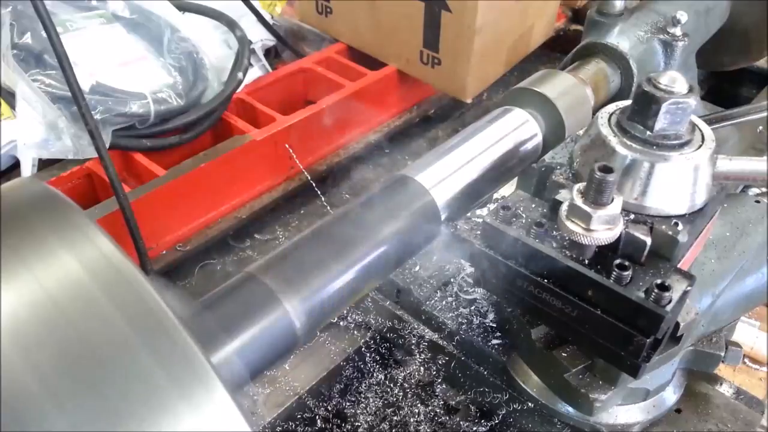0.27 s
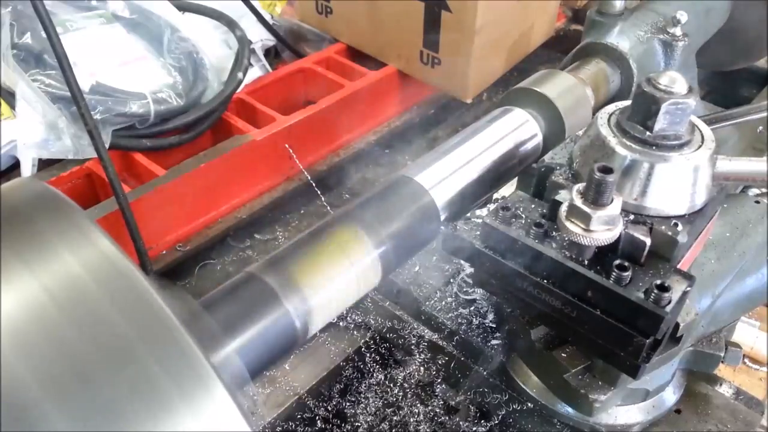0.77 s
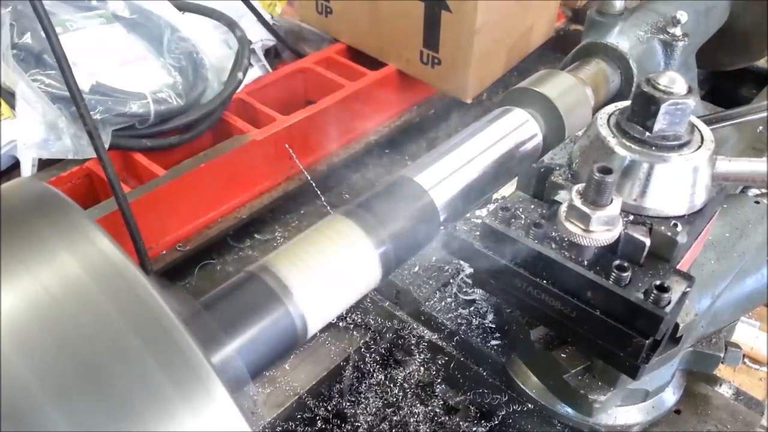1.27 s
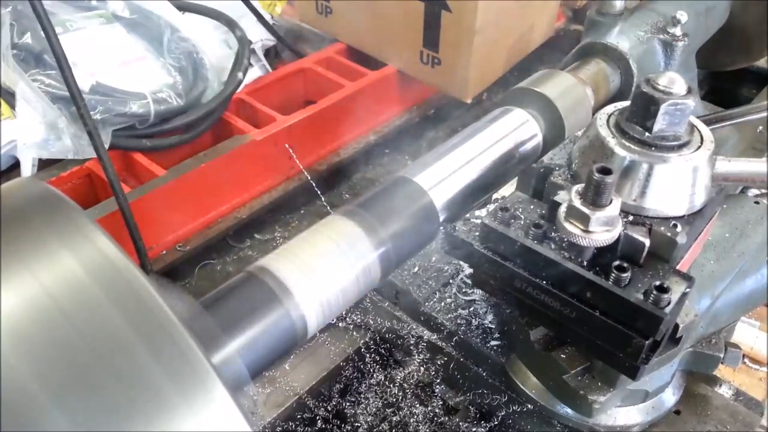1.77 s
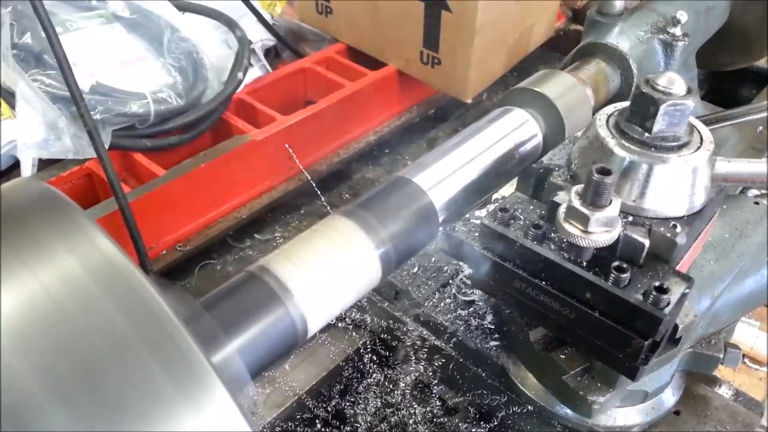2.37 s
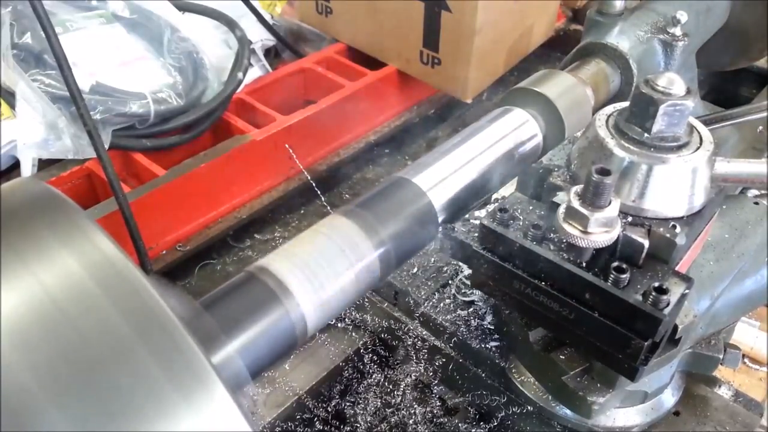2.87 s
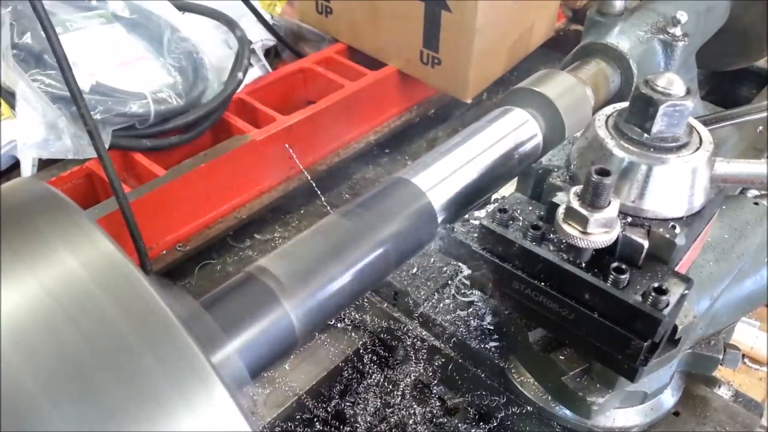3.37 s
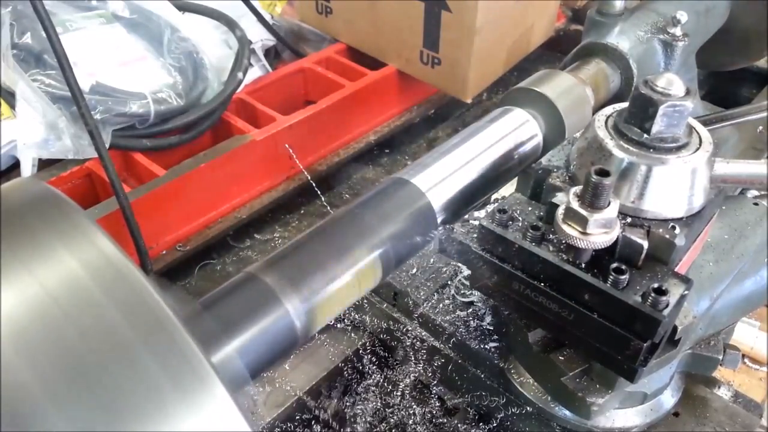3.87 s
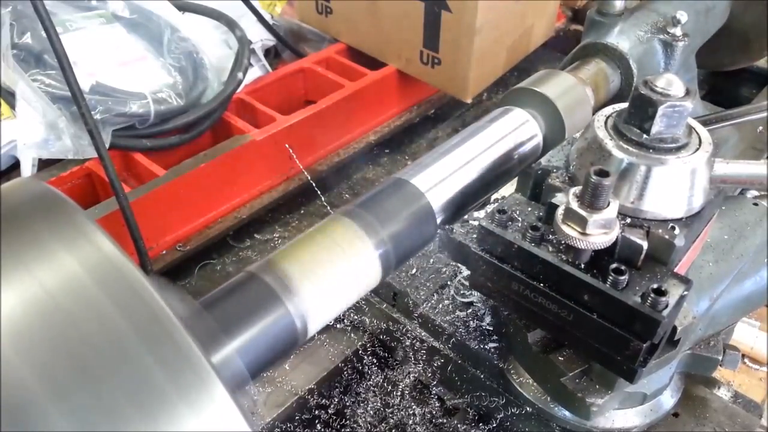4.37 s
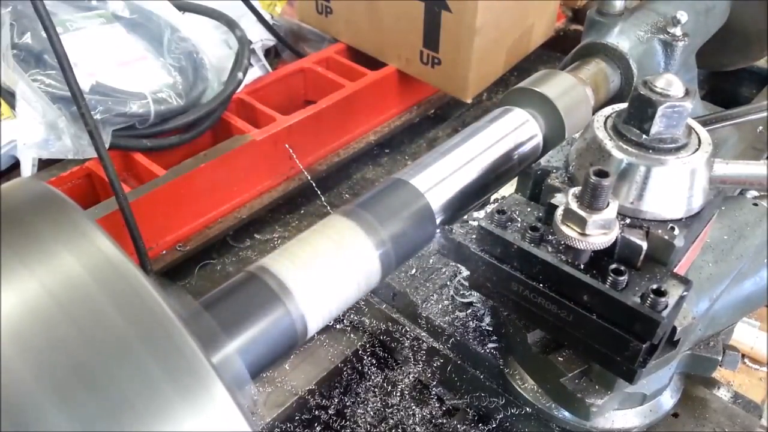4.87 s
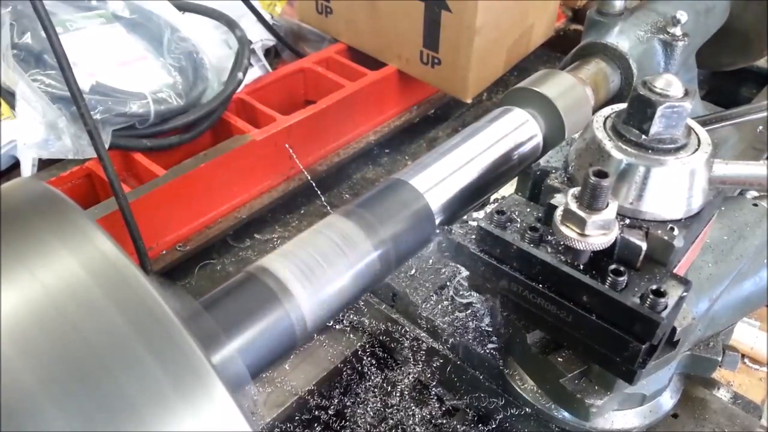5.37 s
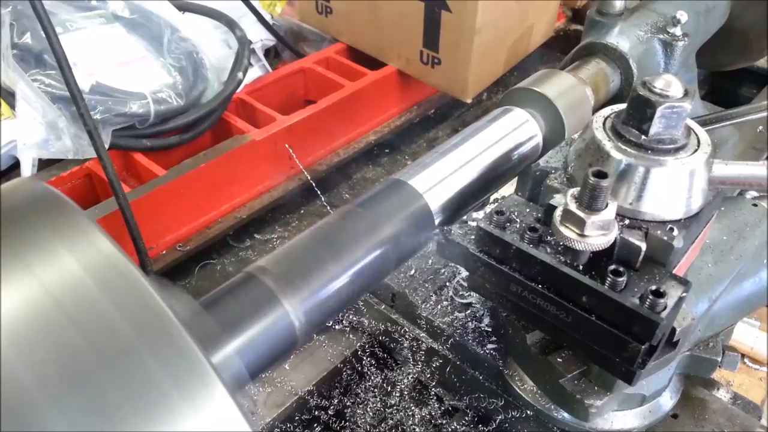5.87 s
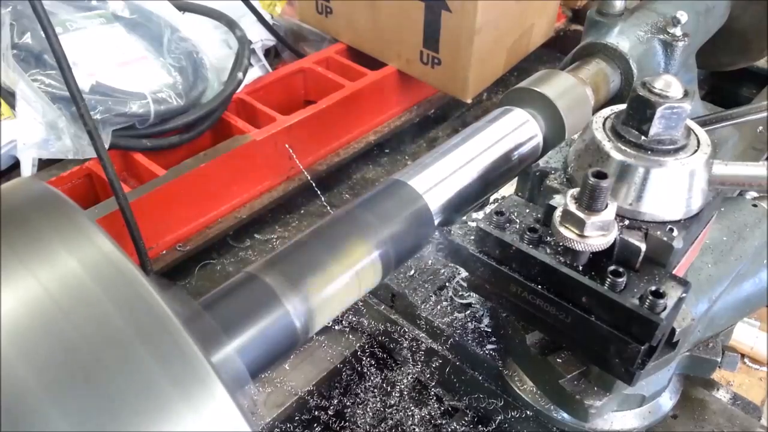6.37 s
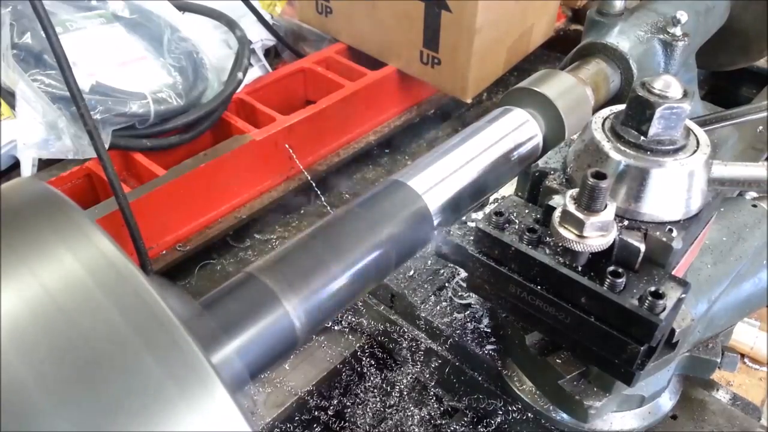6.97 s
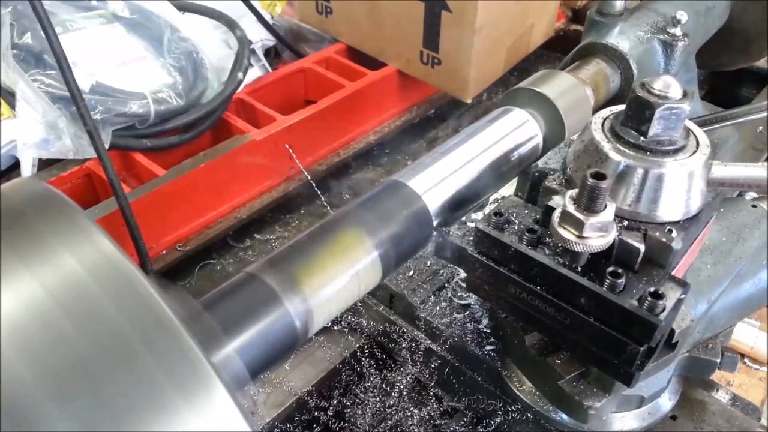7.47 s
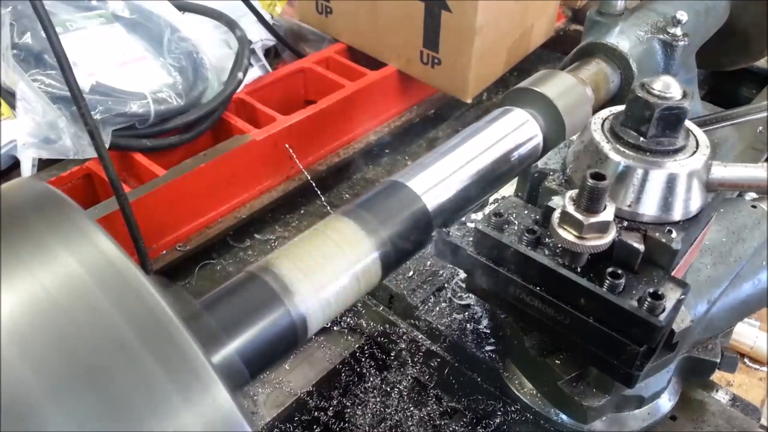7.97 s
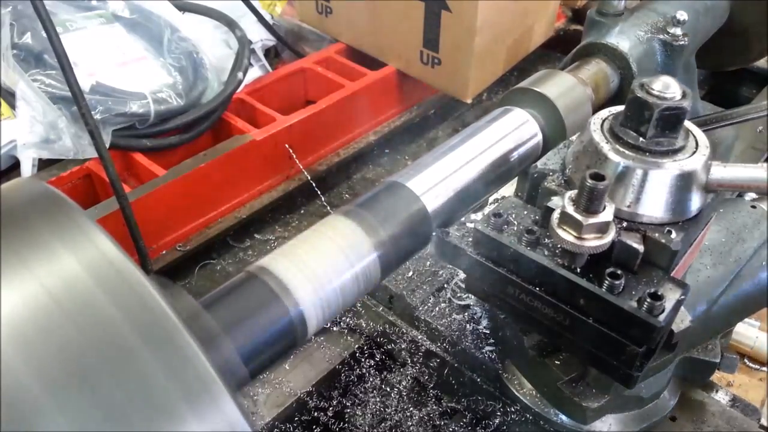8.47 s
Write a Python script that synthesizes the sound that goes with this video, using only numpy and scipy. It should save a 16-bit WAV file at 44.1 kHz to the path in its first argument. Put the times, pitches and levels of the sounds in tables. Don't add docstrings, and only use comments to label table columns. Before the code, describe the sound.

Close up in a workshop, rough metal turning hisses, rattles and hums, then tool chatter swells into a shrill, fluttering squeal with late metallic pings.

```python
import sys
import numpy as np
from scipy import signal
from scipy.fft import rfft, irfft, next_fast_len
from scipy.io import wavfile
from scipy.ndimage import uniform_filter1d

SR = 44100
rng = np.random.default_rng(int(sys.argv[2]) if len(sys.argv) > 2 else 0)


def persist_wave(psi):
    counts = np.round(np.clip(psi, -1, 1) * 32767).astype(np.int16)
    wavfile.write(sys.argv[1], SR, np.atleast_2d(counts).T)


def convert_level_to_amplitude(level_db):
    exponent = np.asarray(level_db, float) / 20
    return 10 ** exponent


N = 384987
T = np.arange(N) / SR
SPINDLE_HZ = 13.61


def curve(table, column=1):
    return np.interp(T, np.array(table)[:, 0], np.array(table)[:, column])


def gain_at(hz, table):
    table_hz, table_db = np.transpose(table)
    return convert_level_to_amplitude(np.interp(np.log(hz + 1), np.log(table_hz), table_db))


def unit(x):
    return x / np.sqrt(np.mean(x ** 2))


def walk(rate):
    hold = int(SR / rate)
    steps = np.repeat(rng.standard_normal(N // hold + 1), hold)
    slow = uniform_filter1d(uniform_filter1d(steps, hold), hold)[:N]
    return unit(slow - slow.mean())


# (frequency [Hz], level [dB])
PUMP_HUM = [(105, -56), (135, -58.5), (162, -60)]


def pump_hum():
    hum = np.zeros(N)
    for hz, db in PUMP_HUM:
        hum += convert_level_to_amplitude(db + 1.8 * walk(2.5)) * np.cos(2 * np.pi * hz * T + .6 * walk(2))
    return np.sqrt(2) * hum


def motor_beat():
    beats_per_s, peak_s, fade_s, rest_db = 1.17, .36, 3.3, -10
    level = convert_level_to_amplitude(-46.5 + rest_db * np.clip((T - fade_s) / .2, 0, 1))
    swell = np.cos(np.pi * beats_per_s * (T - peak_s)) ** 2
    return 2 * level * swell * np.cos(2 * np.pi * 209.9 * T)


def pump():
    band = signal.butter(2, [50, 190], "bandpass", fs=SR, output="sos")
    mid, side = signal.sosfilt(band, rng.standard_normal((2, N)))
    rumble = convert_level_to_amplitude(-69.5) * (unit(mid) + .4 * unit(side) * np.array([[1], [-1]]))
    stop_s, fall_db_per_s, rest_db = 5.3, 99, -35
    run_down_db = np.clip(fall_db_per_s * (stop_s - T), rest_db, 0)
    return (pump_hum() + motor_beat() + rumble) * convert_level_to_amplitude(-3 + run_down_db)


# (time [s], level [dB])
PING_BLOWS = [
    (8.298, -24.5),
    (8.389, -16.5),
    (8.536, -30.5),
]
# (frequency [Hz], level [dB], time to fade 60 dB [s])
PING_TONES = [(1969, 0, .4), (5238, -20, .4), (3381, -18, .15)]


def pings():
    out = np.zeros(N)
    for hit_s, hit_db in PING_BLOWS:
        age = np.maximum(T - hit_s, 0)
        ring = sum(convert_level_to_amplitude(db - 60 * age / t60) * np.sin(2 * np.pi * hz * age) for hz, db, t60 in PING_TONES)
        click = np.gradient(uniform_filter1d(rng.standard_normal(N), size=8)) * 2.5
        tick = 0.83 * np.exp(-age / .002) * click * (T > hit_s)
        out += convert_level_to_amplitude(hit_db) * (ring * np.minimum(age / .002, 1) + tick)
    return out * convert_level_to_amplitude(np.array([[-1.], [1.]]))


# (frequency [Hz], level [dB], level wander [dB], phase wander [rad], wander rate [1/s])
GEAR_WHINE = [(240.1, -27, 1.5, .4, 3), (246.5, -20, 1.0, .3, 3), (493.5, -23, 3, 1.0, 5),
              (2271, -25, 4, 2.0, 10)]


def gear_whine():
    whine = np.zeros(N)
    for hz, db, wander_db, wander_rad, rate in GEAR_WHINE:
        whine += convert_level_to_amplitude(db + wander_db * walk(7.1)) * np.cos(2 * np.pi * hz * T + wander_rad * walk(rate))
    return np.sqrt(2) * whine


def tool_load():
    turn = 2 * np.pi * SPINDLE_HZ * T
    swing = 0.17 * np.cos(4 * turn + 1.5) + 0.028 * np.cos(turn + 1.0)
    return np.exp(swing + 0.09 * np.cos(8 * turn) + 0.049 * np.cos(5 * turn))


# (frequency [Hz], level [dB])
KNOCK_COLOUR = [(200, -14), (800, -6), (1800, -2), (3500, 1), (7000, 2)]


def hiss_and_knocks(size, hz):
    throb = tool_load()
    chance = rng.random((2, N))
    knock_level = convert_level_to_amplitude(np.minimum(-3.5 * np.log(chance[1] + 1e-9), 5.5))
    blows = (chance[0] < 170 * throb ** 2 / SR) * knock_level
    bursts = signal.lfilter([1], [1, -np.exp(-1 / (.0009 * SR))], blows)
    knocks = unit(bursts * rng.standard_normal((3, N)))
    hiss = throb * convert_level_to_amplitude(0.9 * walk(60)) * rng.standard_normal((3, N))
    mesh_hz = 246.5
    low = 1 / (1 + (hz / 800) ** 4)
    mesh = 0.17 * rfft(hiss * np.cos(2 * np.pi * mesh_hz * T), size) * low
    return rfft(hiss, size) + mesh + convert_level_to_amplitude(-7) * rfft(knocks, size) * gain_at(hz, KNOCK_COLOUR)


# (frequency [Hz], level [dB])
MACHINE_COLOUR = [(40, -36), (90, -18.5), (205, -11), (260, 0), (560, -6), (1100, -0.5), (1500, -6.5),
                  (2050, -2.5), (3000, -2), (4440, -3.5), (4520, -5.5), (7500, -17), (9600, -20),
                  (11800, -33.5)]
# (frequency [Hz], width [Hz], level against the broad
# colour [dB])
MACHINE_RINGS = [(372, 25, 2.5), (454.6, 25, 7.5), (507, 13, 7.5), (630, 40.6, 10), (712, 35, 10.5),
                 (869, 33, 5.5), (970, 48, 8), (1234, 130, 7.5), (1735, 139, 10.5), (2221, 62, 6),
                 (2270.5, 22, 10.5), (2358, 94, 6), (2620, 57, 4), (8850, 910, 7),
                 (3080, 52, 1.5), (3380, 46, 3), (3490, 130, 0), (3957, 84, 6), (4250, 55, 6.5),
                (4410, 40, 5.5), (4750, 60, 3), (5250, 60, 3), (5320, 40, 3), (5820, 120, 1.5),
                (5950, 200, -3.5)]


def machine_body(hz):
    body = gain_at(hz, MACHINE_COLOUR)
    for ring_hz, width, db in MACHINE_RINGS:
        body = body * (1 + (convert_level_to_amplitude(db) - 1) / (1 + 2j * (hz - ring_hz) / width))
    return body


# (frequency [Hz], level [dB])
WALL_SHARE = [(40, 0.5), (120, -3), (250, -7.5), (600, -8), (1200, -4.5), (2500, -2.5), (5000, 0),
              (9000, 1)]
# (frequency [Hz], level [dB])
PHONE_SHADE = [(60, 2.5), (300, -3), (600, -0.5), (1000, -4), (1500, -1), (1900, -5.5), (3300, 1.5),
               (4500, -3), (6000, -7.5), (7700, -10.5), (9500, -8.5)]


def lathe():
    size = next_fast_len(N)
    hz = np.arange(size // 2 + 1) * SR / size
    body = machine_body(hz)
    wet = np.minimum(gain_at(hz, WALL_SHARE), .98)
    straight, *scattered = hiss_and_knocks(size, hz)
    near = straight * np.sqrt(1 - wet ** 2)
    lag_s = 14.5 / SR
    lag = np.exp(-2j * np.pi * hz * lag_s / (1 + (330 / (hz + 1)) ** 3))
    left = body * (lag * near + wet * scattered[0])
    right = body * (near + wet * scattered[1])
    scale = np.sqrt(np.mean(irfft(right, size) ** 2))
    tones = rfft(gear_whine(), size)
    left_port = (left / scale + lag * tones) * gain_at(hz, PHONE_SHADE)
    right_port = right / scale + tones
    return irfft(np.array([left_port, right_port]), size)[:, :N] * convert_level_to_amplitude(-21.5)


# (time [s], level [dB])
SQUEAL_LEVEL = [(0, -50), (.06, -43.5), (.24, -38.5), (.82, -35.5), (1.2, -38.5), (1.6, -40), (2.65, -40),
                (2.8, -35), (3.4, -33), (3.95, -21.5), (4.3, -15.5), (4.95, -9.5), (5.4, -7.5), (6.1, -7.5),
                (7.1, -9.5), (7.6, -8.5), (8.07, -6), (8.73, -7.5)]
# (time [s], depth [dB], half width [s])
SQUEAL_STALLS = [
    (1.51, 6, 0.046),
    (1.7, 16, 0.065),
    (1.82, 10, .09),
    (2.04, 8, 0.1),
    (2.16, 14, 0.097),
]
# (time [s], left minus right level [dB], lead of the left port [rad])
ECHO_DRIFT = [(0, -1.5, .08), (2, -1.5, .02), (3.4, .5, 0.028), (4.9, 3, 0.49), (5.6, 1.5, 0.62),
              (6.1, 0, 0.5), (6.6, 1.5, .5), (7.6, -0.5, 0.13), (8.73, -0.5, 0.51)]


def chatter():
    stall_db = sum(depth_db * np.maximum(1 - abs(T - s) / half, 0) for s, depth_db, half in SQUEAL_STALLS)
    sway_hz, peak_s, middle_s, span_s = 4.1, 8.06, 8.05, .45
    sway = np.exp(-((T - middle_s) / span_s) ** 2) * np.cos(2 * np.pi * sway_hz * (T - peak_s))
    return curve(SQUEAL_LEVEL) - stall_db, curve(ECHO_DRIFT) + 1.5 * sway, curve(ECHO_DRIFT, column=2)


# (distance from the pitch [turns], level under the squeal [dB])
FLAW_LINES = [(-24, -56), (-18, -46), (-15, -48), (-9, -37), (-6, -42), (6, -46), (10, -46), (13, -39),
              (15, -56), (22, -46), (26, -60)]


def shaft_flaw(turn):
    orders = [k for k in range(-24, 27) if abs(k) > 5]
    spread = rng.random((len(orders), 2))
    flaw_db = np.interp(orders, *np.transpose(FLAW_LINES)) + 6 * (spread[:, 0] - .5)
    one_turn = np.linspace(0, 2 * np.pi, 1024)
    shape = np.zeros(1024, complex)
    for k, db, start in zip(orders, flaw_db, spread[:, 1]):
        shape += convert_level_to_amplitude(db) * np.exp(1j * (k * one_turn + 2 * np.pi * start))
    return np.interp(turn % (2 * np.pi), one_turn, shape) * convert_level_to_amplitude(2.0 * walk(6.9))


def chip_fuzz():
    close = convert_level_to_amplitude(-33) * (walk(450) + 1j * walk(450))
    wide = convert_level_to_amplitude(-51) * walk(1500) * np.exp(1j * np.pi * walk(530))
    return close + wide


TURN_WAVER = [
    [(1, .075, 1.9, .17, -1.4), (4, .15, 1.9, .5, 1.0), (8, .02, 1.4, .03, -.8)],
    [(1, .095, 1.8, .23, -1.5), (4, .24, 2.6, .72, 1.1), (8, .05, 2.1, .05, .4)],
]
# (time [s], factor)
WAVER_AMOUNT = [(0, 0.37), (3.6, 1.2), (7.5, 1), (8.73, .8)]


def squeal():
    turn = 2 * np.pi * SPINDLE_HZ * T
    pitch_hz = 8664 - 3.25 * T
    phase = 2 * np.pi * np.cumsum(pitch_hz) / SR + .03 * walk(40)
    shake = .05 * walk(12) + .015 * walk(60)
    depth = curve(WAVER_AMOUNT)
    level_db, pan_db, lead = chatter()
    out = []
    for side, rows in zip((.5, -.5), TURN_WAVER):
        swing = sum(a * np.cos(k * turn + at) for k, a, at, _, _ in rows)
        twist = sum(p * np.cos(k * turn + at) for k, _, _, p, at in rows)
        for k in (3, 5, 6):
            twist = twist + .04 * np.cos(k * turn + 2 * np.pi * rng.random())
        own = 0.065 * walk(39)
        port_phase = phase + depth * twist + side * lead + .04 * walk(9)
        tone = np.exp(depth * swing + shake + own) * np.cos(port_phase)
        tone = tone + np.real((shaft_flaw(turn) + chip_fuzz()) * np.exp(1j * phase))
        out.append(np.sqrt(2) * tone * convert_level_to_amplitude(level_db + side * pan_db))
    return np.array(out)


def scene():
    return pump() + pings() + lathe() + squeal()


def top_cut(x):
    return signal.sosfilt(signal.butter(12, 11880, fs=SR, output="sos"), x)


def record(dry):
    knee_db, duck_per_db, lag_s = -19, 0.48, .1
    keep = np.exp(-1 / (lag_s * SR))
    power = signal.lfilter([1 - keep], [1, -keep], np.mean(dry ** 2, axis=0))
    loud_db = 10 * np.log10(power + 1e-12)
    mix = dry * convert_level_to_amplitude(-duck_per_db * np.maximum(loud_db - knee_db, 0))
    return top_cut(mix)


dry = scene()
out = record(dry)
persist_wave(out)
```